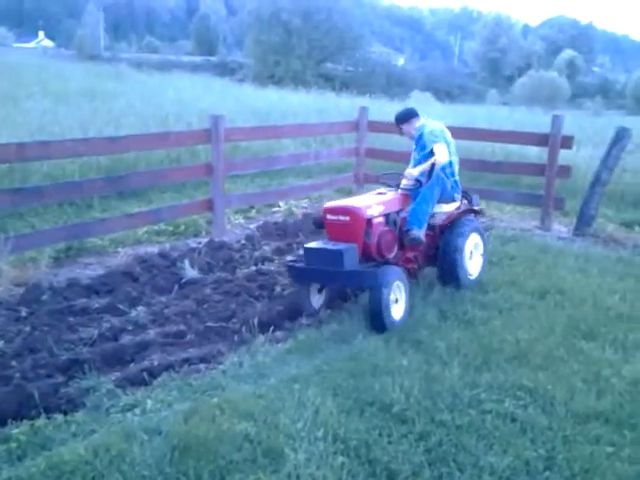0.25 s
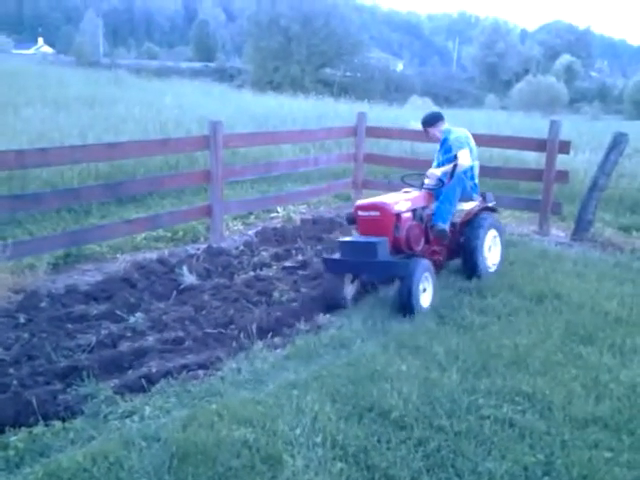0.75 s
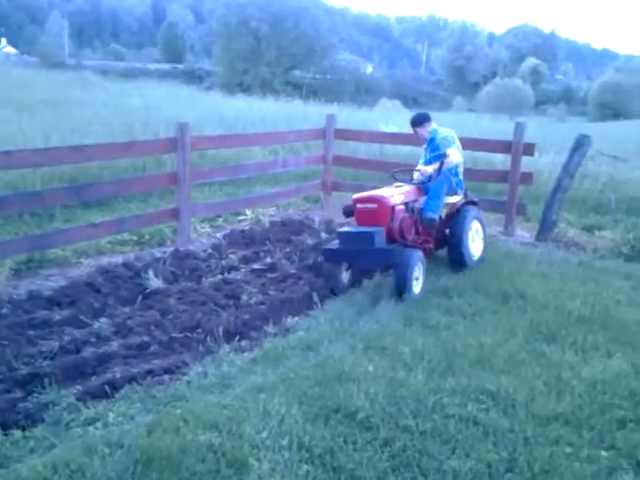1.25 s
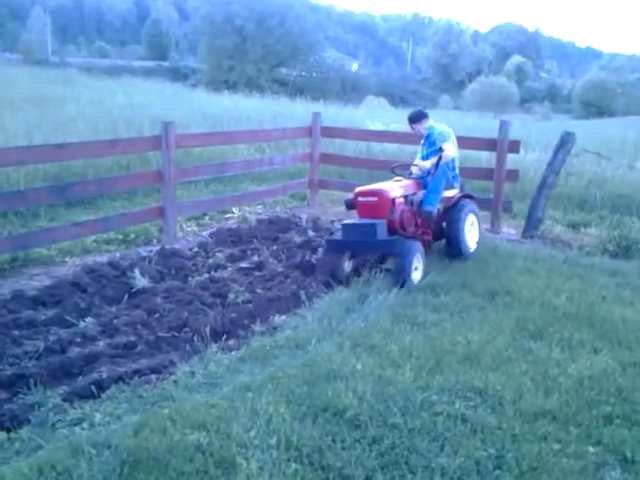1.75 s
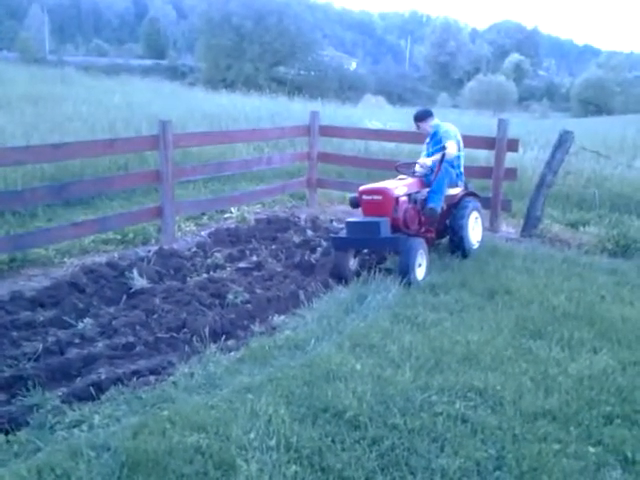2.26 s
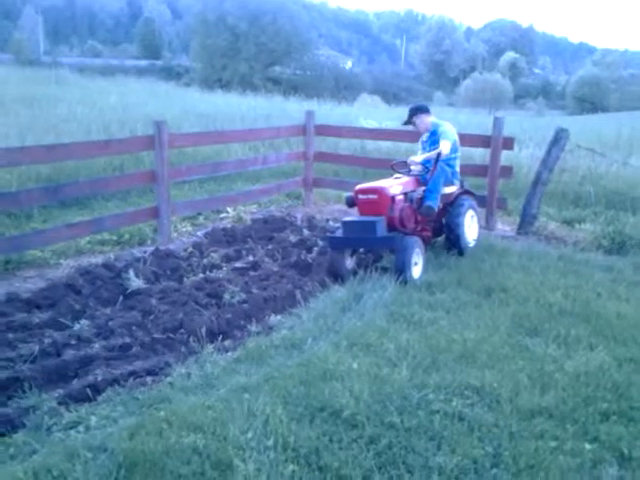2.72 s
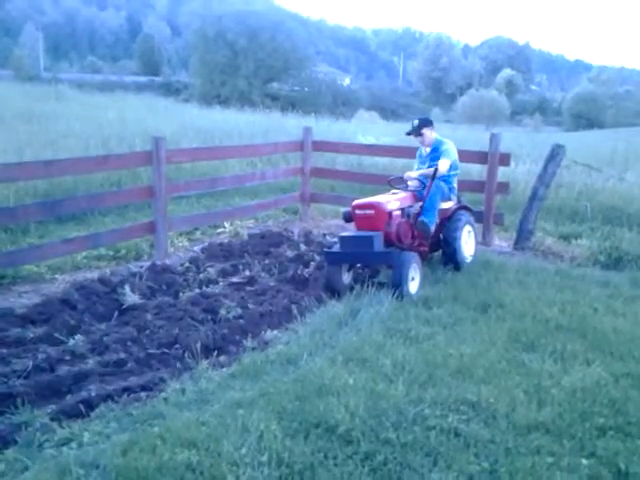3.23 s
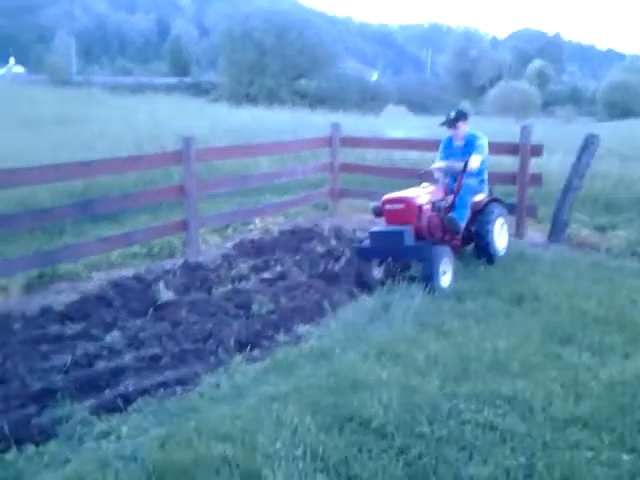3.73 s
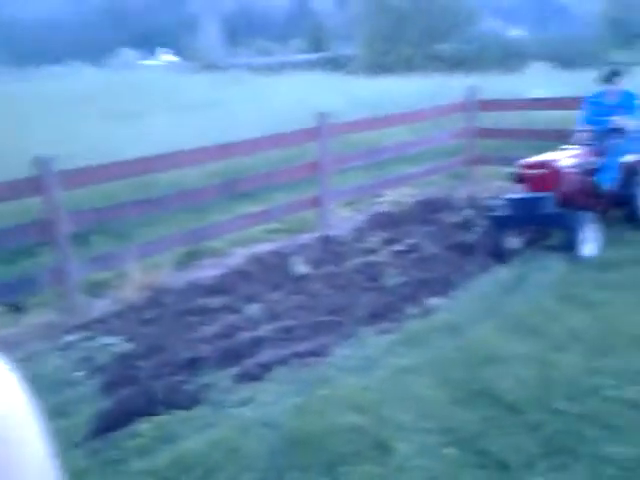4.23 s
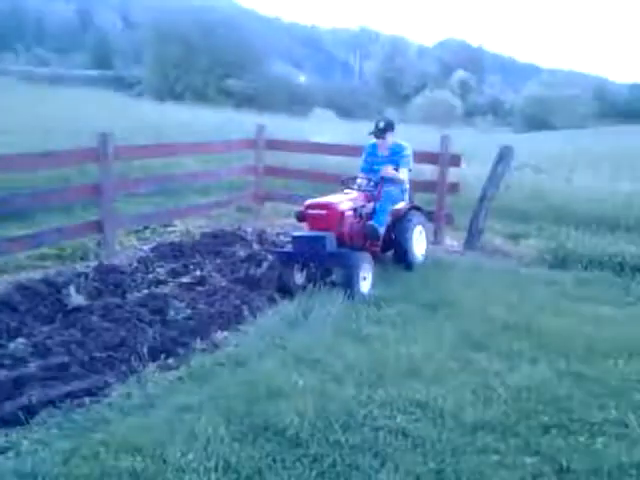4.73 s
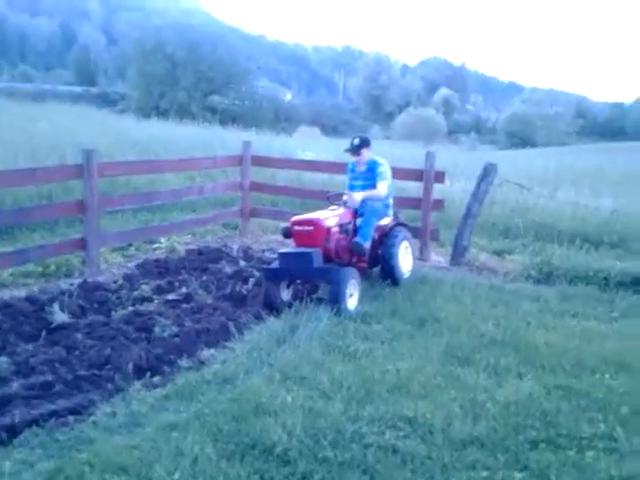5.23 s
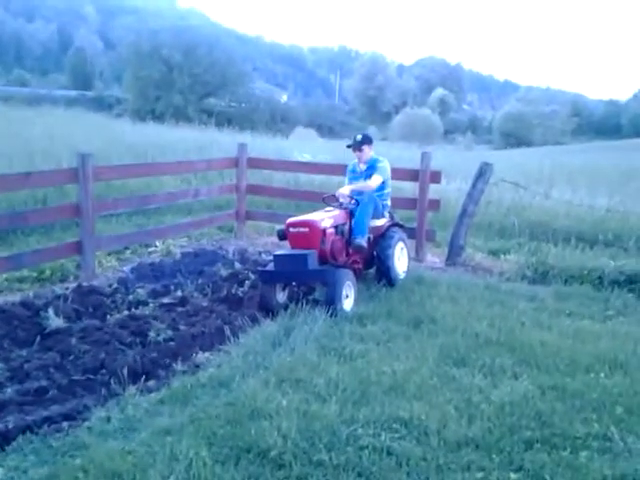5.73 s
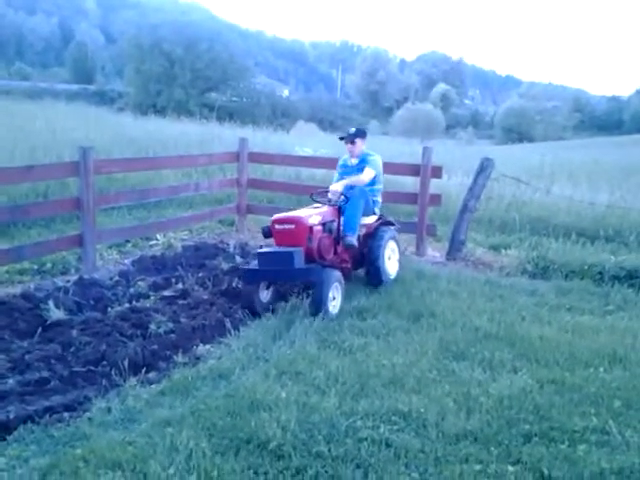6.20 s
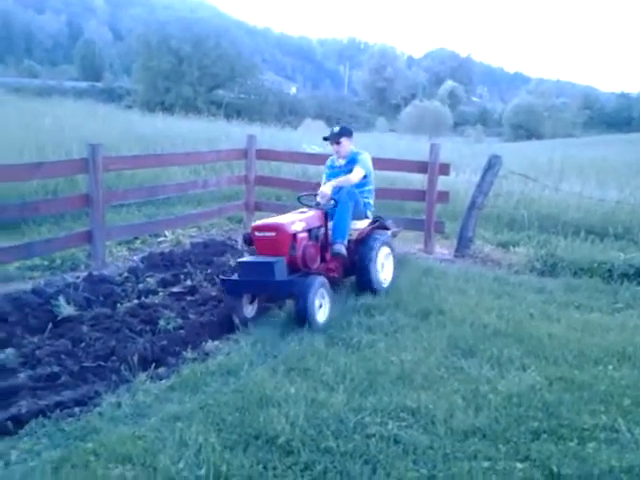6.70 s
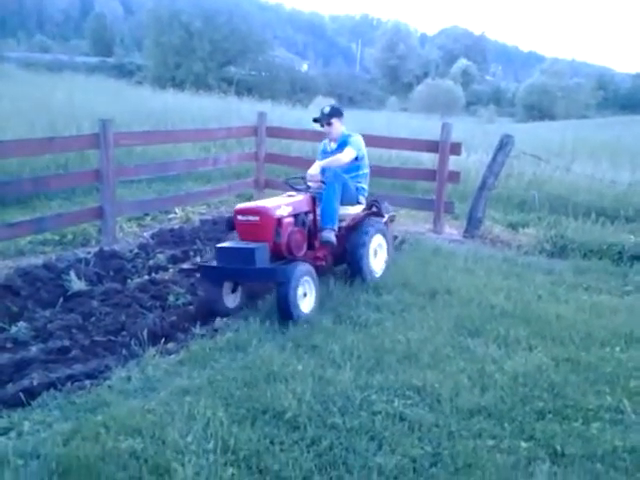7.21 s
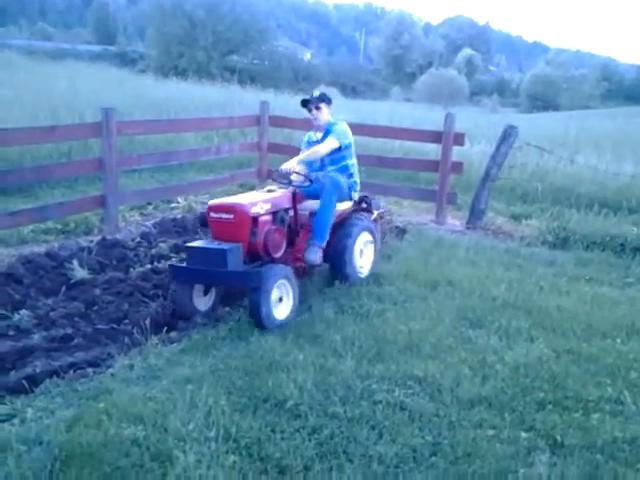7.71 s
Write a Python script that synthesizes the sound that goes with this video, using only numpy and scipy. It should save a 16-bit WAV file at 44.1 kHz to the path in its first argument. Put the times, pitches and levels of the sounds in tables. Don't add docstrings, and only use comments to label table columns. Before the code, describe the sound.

In an open field with no echo, a garden tractor's engine makes a coarse, fluttering putter, with whistling gas bursts and rattling casing. Slight wind and soft bumps reach the handheld microphone. Midway a hand rubs and closes over it, hollowing and darkening the sound. The engine labours, picks up speed, and runs on faintly; a dull bump and two small stone clicks on metal come last.

```python
import sys
import numpy as np
from scipy import signal
from scipy.fft import rfft, irfft
from scipy.io import wavfile
from scipy.ndimage import uniform_filter1d

SR = 44100
rng = np.random.default_rng(int(sys.argv[2]) if len(sys.argv) > 2 else 0)


def boost_factor(decibels):
    exponent = np.asarray(decibels, float) / 20
    return 10 ** exponent


def transcribe(signal):
    frames = np.atleast_2d(signal).T
    limited = np.clip(frames, -1, 1)
    pcm = np.round(limited * 32767).astype(np.int16)
    wavfile.write(sys.argv[1], SR, pcm)


N = 351036
T = np.arange(N) / SR

# time [s], firings per second [1/s].
SPEED = [(0, 25.407), (.79, 25.54), (1.1, 25.232), (1.43, 25.883), (1.69, 25.481), (2.14, 26.396),
         (3.09, 25.877), (3.84, 26.143), (4.56, 25.382), (4.57, 24.833), (5.16, 23.596), (5.39, 23.664),
         (5.61, 26.719), (5.81, 28.524), (6.03, 27.596), (6.82, 28.364), (7.44, 27.574), (7.96, 28.102)]
# time [s], load [dB], how far the exhaust outlet faces the listener [dB].
ENGINE = [(0, 1, 4.5), (.42, 2, -0.5), (.62, 1, 2.5), (1.0, 1.5, 4), (1.7, 0, 4), (2.1, 0.5, 0.5),
          (2.7, 5, -7.5), (3.1, 4, -8.5), (3.3, 0.5, -3), (4.5, 2.5, -12), (5.05, 8, -17), (5.25, 10, -14),
          (5.36, 2, 4), (5.5, 16, 6.5), (5.64, 14.5, 3), (5.8, 4.5, -3), (6.1, 2, -6), (7.96, -7, -3.5)]
# time [s], level change by covering [dB], treble shading [dB].
HAND = [(3.0, -4.5, 0), (3.27, -1.5, 1.5), (3.37, -2, -2), (3.5, 0.5, -12), (3.65, 3, -12),
        (3.83, -3.5, 1.5), (4.17, -1.5, -0.5), (4.54, 0, -1.5), (4.7, -3.5, -16.5), (4.86, -6.5, -29),
        (4.92, -4, -13.5), (4.97, -4, -17), (5.05, -10.5, -25), (5.17, -20.5, -15.5), (5.6, -18.5, -7.5),
        (5.9, -21, -11.5), (6.5, -23.5, -8), (7.96, -26, -0.5)]
# time [s], gain [dB].
ODD = [(0.388, 5.5), (0.858, 3.5), (0.977, -3.5), (1.016, -3.5), (2.41, 5.5), (2.754, 5.5), (3.485, -4),
       (3.754, 6), (4.649, 5.5), (4.895, 6.5), (4.978, 1), (5.273, -11), (5.315, 6.5), (5.399, -1.5),
       (5.598, 1.5), (6.103, 0), (7.172, -1)]


def evened(x):
    return x / np.sqrt(np.mean(x ** 2) + 1e-20)


def column(table, k):
    return np.interp(T, [row[0] for row in table], [row[k] for row in table])


def filtered(x, points):
    hz, db = np.transpose(points)
    f = np.fft.rfftfreq(N, 1 / SR)
    gain_db = np.interp(np.log(f + 1), np.log(hz), db)
    return irfft(rfft(x) * boost_factor(gain_db), N)


def coloured(points):
    return evened(filtered(rng.standard_normal(N), points))


def resonate(x, hz, width):
    turn = np.exp(2j * np.pi * np.cumsum(hz * np.ones(N)) / SR)
    r = np.exp(-np.pi * width / SR)
    smooth = signal.lfilter([1], [1, -2 * r, r * r], x / turn)
    return evened((turn * smooth).real)


def follow(part):
    controls = [column(ENGINE, 1), column(ENGINE, 2), column(HAND, 1), column(HAND, 2)]
    return part[1] + np.dot(part[2:], controls)


def shaded(x, parts):
    hz, t, z = signal.stft(x, SR, nperseg=256, noverlap=192)
    at = np.log([part[0] for part in parts])
    db = 0
    for k, part in enumerate(parts):
        weight = np.interp(np.log(hz + 1), at, np.eye(len(at))[k])
        db = db + np.outer(weight, np.interp(t, T, follow(part)))
    return signal.istft(z * boost_factor(db), SR, nperseg=256, noverlap=192)[1][:N]


def crank():
    cycles = 0.228 + np.cumsum(column(SPEED, 1)) / SR
    last = cycles.astype(int)
    when = np.interp(np.arange(last[-1] + 1), cycles, T)
    when[0] = 2 * when[1] - when[2]
    return last, (T - when[last]) * 1000


def strength(last, table=ODD):
    s, odd_db = np.transpose(table)
    db = np.zeros(last[-1] + 1)
    db[last[np.round(s * SR).astype(int)]] = odd_db
    return boost_factor(uniform_filter1d(db[last], size=60))


def ring(last, modes, blows, spread_db, jitter_ms):
    # time [s], gain of the firing [dB].
    stumbles = [(4.455, 2.5), (4.613, 3.5), (4.654, -6), (4.693, 1), (4.733, 3), (4.774, 2.5), (4.859, -6),
                (4.897, 2.5), (4.98, 2), (5.022, 4.5), (5.064, 0), (5.105, 5), (5.19, 4), (5.232, -2),
                (5.36, -4)]
    usual_speed = 25.7
    starts = np.flatnonzero(np.diff(last)) + 1
    load_db = column(ENGINE, 1)[starts]
    stretch = usual_speed / column(SPEED, 1)[starts]
    kick = strength(last, stumbles)[np.minimum(starts + 100, N - 1)]
    whole = rng.standard_normal((len(starts), len(blows), 2))
    t = np.arange(8000) / SR
    out = np.zeros(N)
    for hz, db, t60 in modes:
        clicks = np.zeros(N + SR)
        for k, (ms, force, share) in enumerate(blows):
            size, slip = (0.8 * whole[:, k] + 0.6 * rng.standard_normal((len(starts), 2))).T
            delay_ms = ms * stretch + jitter_ms * slip
            at = starts + np.round(delay_ms * SR / 1000).astype(int)
            clicks[np.maximum(at, 0)] += force * kick * boost_factor(spread_db * size + share * load_db)
        tone = boost_factor(db - 60 * t / t60) * np.sin(2 * np.pi * hz * t)
        out += signal.oaconvolve(clicks, tone)[:N]
    return evened(uniform_filter1d(out, size=10))


def muffler(last):
    # frequency [Hz], level [dB], t60 [s].
    thump_modes = [(142, 0, 0.025), (214, 3, 0.072), (265.4, 1, 0.076), (376, -13.5, 0.083)]
    bark_modes = [(800, -50, 0.059), (899, 33, .022), (1690, 7, 0.024)]
    shell_modes = [(538, -11, .13), (622, -1, .12), (700, -9, .08), (775, -4, .08), (860, -.5, .085),
                   (945, -5, .08), (1040, -9, .08)]
    # time after the firing [ms], signed strength, share of load [dB per dB].
    thump_blows = [
        (-1.5, -0.99, 0),
        (10.6, -0.1, 0),
        (22.6, 0.25, 0),
    ]
    bark_blows = [
        (0.1, -0.3, 0.17),
        (10, 0.19, 1),
        (11, -0.77, -0.3),
        (19.5, 0.88, -0.5),
    ]
    # frequency [Hz], base [dB],
    # shares of load, facing, covering and shading [dB per dB].
    pop = [(200, -3, 0.88, 0.043, 0.36, 0.18), (850, 6, 0.84, 0.084, 0.72, -0.053)]
    thump = ring(last, thump_modes, thump_blows, spread_db=1.3, jitter_ms=0.1)
    bark = ring(last, bark_modes, bark_blows, spread_db=1.3, jitter_ms=0.04)
    shell = ring(last, shell_modes, bark_blows[:1], spread_db=1.0, jitter_ms=0.04)
    high_pass = signal.butter(2, 480, "high", fs=SR, output="sos")
    upper = evened(signal.sosfilt(high_pass, bark + 1.3 * shell))
    return boost_factor(-33.5 + follow(pop[0])) * thump + boost_factor(-32.5 + follow(pop[1])) * upper


def puff(ms, rise_ms, power=2):
    u = np.maximum(ms, 0) / rise_ms
    return (u * np.exp(1 - u)) ** power


def jet(last, ms):
    # frequency [Hz], width [Hz], level [dB].
    whistles = [(3735, 384, 6.5), (4300, 600, -8), (6934, 770, -2.5), (10050, 870, -4.5), (12900, 1200, -7)]
    # frequency [Hz], density [dB per Hz].
    gas_hiss = [(900, -45), (2000, 1), (3500, 6), (6000, -1.5), (9000, -3), (15000, -5)]
    # time [s], level [dB].
    second_puff = [(0, -2), (1, -1.5), (1.6, 2), (2.6, 2.5), (3.1, -3.5), (4.2, 0), (4.7, -3), (5.5, .5),
                   (5.95, .5), (6.2, -4.5), (7.96, -4)]
    # frequency [Hz], base [dB],
    # shares of load, facing, covering and shading [dB per dB].
    jet_colour = [(3840, 2.5, 0.56, 0.54, 0.98, 0.11), (7000, 7.9, 0.26, 0.15, 0.71, 1.19),
                  (13000, 2.66, 0.47, 0.79, 0.52, 0.28)]
    second = (ms > 7.4).astype(int)
    chance = rng.standard_normal((last[-1] + 1, 2, 2 * len(whistles) + 2))[last, second]
    share = boost_factor(column(second_puff, 1))
    late = ms - 7.4 - 0.05 * chance[:, -2]
    tail = 0.095 * puff(ms - 0.3, 14.8)
    sing = puff(ms - 0.7, 1.95) + share * puff(late, 2.33) + tail
    spit = puff(ms - 1.2, 0.62, power=0.68) + 0.51 * share * puff(late - 0.6, 1.0, power=0.49) + tail
    tones = np.zeros(N)
    for k, (hz, width, db) in enumerate(whistles):
        level = boost_factor(db + 1.9 * np.minimum(chance[:, 2 * k], 1.3))
        pitch_hz = hz * (1 + 0.044 * chance[:, 2 * k + 1])
        tones += level * resonate(rng.standard_normal(N), pitch_hz, width)
    gas = evened(tones) * sing + boost_factor(-0.5) * coloured(gas_hiss) * spit
    gas = gas * boost_factor(1.6 * chance[:, -1]) / np.sqrt(1 + share ** 2)
    return boost_factor(-21.5) * shaded(evened(gas) * strength(last), jet_colour)


def shake(last, ms, depth, spread_db):
    swell = 1 + depth * puff(ms - 0.5, 3.2)
    chance = rng.standard_normal(last[-1] + 1)[last]
    return swell * boost_factor(spread_db * uniform_filter1d(chance, size=300))


def block(last, ms):
    # frequency [Hz], density [dB per Hz].
    casing = [(150, -44), (260, -27), (480, -30), (750, -9), (1200, -10), (3000, -10), (5500, -16),
              (9000, -21), (15500, -27)]
    # frequency [Hz], width [Hz], level [dB].
    panel_modes = [(656, 570, -20), (844, 320, 7.5), (1410, 330, 3), (1787, 107, 7), (2053, 74, -1),
                   (2504, 385, 9.5), (3614, 110, 5.5), (4840, 290, -8), (7050, 1600, -0.5),
                   (9030, 360, -17)]
    # frequency [Hz], base [dB],
    # shares of load, facing, covering and shading [dB per dB].
    roar = [(744, 2.55, 0.74, 0.054, 0.61, 0.016), (2200, 1.2, 0.91, 0.089, 1.006, 0.21),
            (8100, 1.24, 0.24, -0.25, 0.73, 1), (13000, 1.2, .1, -0.69, .7, .45)]
    ticks = rng.random(N) < 0.012
    drive = rng.standard_normal(N) * (1 + 0.54 * ticks)
    panels = sum(boost_factor(db) * resonate(drive, hz, width) for hz, width, db in panel_modes)
    clatter = boost_factor(-2.0) * evened(panels) + coloured(casing)
    shaken = clatter * shake(last, ms, depth=0.62, spread_db=1.24)
    return boost_factor(-21) * shaded(evened(shaken), roar)


def palm(x):
    # time [s], centre [Hz], gain [dB].
    notch = [(2.6, 10900, 4), (3.05, 11200, 3), (3.25, 10750, -8), (3.5, 9300, -8.5), (3.8, 8800, -8),
             (4.1, 8300, 0), (4.25, 11800, -2.5), (4.45, 12980, -11), (4.8, 13000, -10)]
    hz, t, z = signal.stft(x, SR, nperseg=256, noverlap=192)
    s, centre_hz, depth_db = np.transpose(notch)
    width_octaves = 0.27
    off = np.log2((hz[:, None] + 1) / np.interp(t, s, centre_hz)) / width_octaves
    gain = boost_factor(np.interp(t, s, depth_db) * np.exp(-off ** 2))
    return signal.istft(z * gain, SR, nperseg=256, noverlap=192)[1][:N]


def lumpy(size):
    once = uniform_filter1d(rng.standard_normal(N), size=size)
    return evened(uniform_filter1d(once, size=size // 2))


def wind():
    # frequency [Hz], density [dB per Hz].
    rumble = [(12, -20), (40, -2), (65, -2), (110, -10), (300, -20), (500, -40)]
    # time [s], level [dB].
    gusts = [(0.0, -56.5), (1.99, -55), (2.19, -51), (5.0, -76), (5.3, -60), (5.56, -53), (5.96, -61),
             (7.96, -70)]
    # time [s], level over the wind [dB].
    bumps = [
        (.18, 8),
        (.42, 16),
        (.95, 12),
        (3.05, 12),
        (6.92, 19),
        (7.45, 6),
    ]
    bumps_db = sum(db * np.exp(-((T - s) / 0.023) ** 2) for s, db in bumps)
    level_db = -7.5 + 2.4 * lumpy(3000) + bumps_db + column(gusts, 1)
    return boost_factor(level_db) * coloured(rumble)


def rub():
    # frequency [Hz], density [dB per Hz].
    skin = [(110, -32), (170, -5.5), (230, 4.5), (300, 1), (450, -32.5)]
    hand_db = -0.79 * column(HAND, 2) + 0.3 * column(HAND, 1)
    return boost_factor(-54.5 + hand_db + 2.1 * lumpy(1200)) * coloured(skin)


def cupped_hand(last, ms):
    # frequency [Hz], width [Hz], level [dB].
    hollow = [(2364, 340, -6.5), (3310, 240, -1), (3535, 190, -1.5), (4520, 660, 3.5), (5240, 290, 4.5),
              (5930, 420, 3.2), (7320, 480, -21)]
    # time [s], level [dB].
    cup = [(2.94, -43), (3.15, -32), (3.4, -16), (4.5, -20.5), (4.6, -11), (4.85, -33), (4.93, -16),
           (5.1, -41), (5.27, -57)]
    drive = rng.standard_normal(N) * shake(last, ms, depth=0.76, spread_db=1.5) * strength(last) ** 0.5
    shade_db = uniform_filter1d(column(HAND, 2), size=4000)
    ringing = np.zeros(N)
    for hz, width, db in hollow:
        wander = evened(uniform_filter1d(rng.standard_normal(N), size=9000))
        shut_db = 0.93 * shade_db * max(np.log2(hz / 4500), 0) / 0.26
        ringing += boost_factor(db + 2.5 * wander + shut_db) * resonate(drive, hz * (1 + 0.015 * wander), width)
    held = (T > cup[0][0]) & (T < cup[-1][0])
    return boost_factor(column(cup, 1)) * held * evened(ringing)


def stones():
    # time [s], peak level [dB].
    hits = [
        (7.4455, -38),
        (7.8271, -37),
    ]
    # frequency [Hz], level [dB], t60 [s].
    share_modes = [(1700, -6, .02), (2900, -1, 0.018), (3320, -2, .02)]
    out = np.zeros(N)
    for s, peak_db in hits:
        t = np.maximum(T - s, 0)
        for hz, db, t60 in share_modes:
            out += boost_factor(peak_db + db - 60 * t / t60) * np.sin(2 * np.pi * hz * t)
    return out


def scene():
    # frequency [Hz], gain [dB].
    ground = [(420, -0.9), (488, -16), (545, -0.63), (10700, 0), (11250, -2), (12000, 0)]
    # frequency [Hz], gain [dB].
    covered = [(140, 4.5), (330, -0.5), (488, 6), (570, -0.8), (2400, -2.3), (3050, -8), (4700, 2.5),
               (5800, -8), (7000, -1), (9800, -6), (12500, 7), (15500, 5)]
    last, ms = crank()
    airy = jet(last, ms) + block(last, ms) + cupped_hand(last, ms)
    engine = filtered(muffler(last) + palm(airy), ground)
    cover = np.clip((T - 5.05) / 0.29, 0, 1)
    engine = (1 - cover) * engine + cover * filtered(engine, covered)
    low_cut = signal.butter(8, 134, "high", fs=SR, output="sos")
    mix = signal.sosfilt(low_cut, engine) + wind() + rub() + stones()
    return mix[None]


def low_pass(x):
    return signal.sosfilt(signal.butter(12, 16970, fs=SR, output="sos"), x)


def record(dry):
    soft = 0.95 * np.tanh(dry / 0.95)
    edge = signal.firwin(401, 15700, window=("kaiser", 6), fs=SR)
    finished = signal.oaconvolve(soft, edge[None], "same")
    return low_pass(finished)


dry = scene()
out = record(dry)
transcribe(out)
```